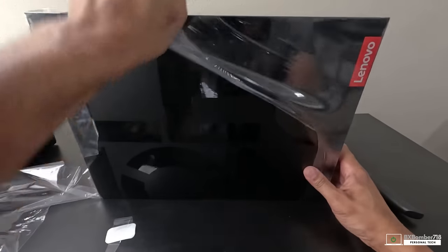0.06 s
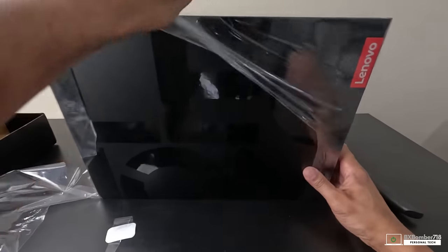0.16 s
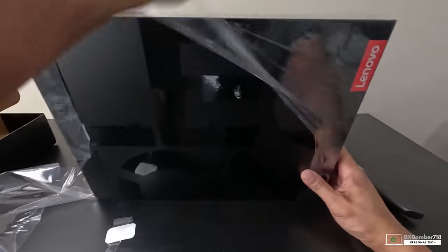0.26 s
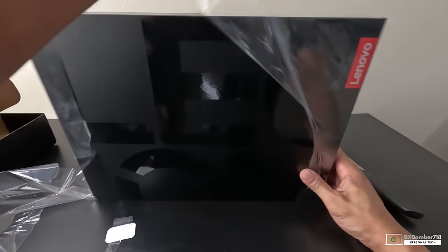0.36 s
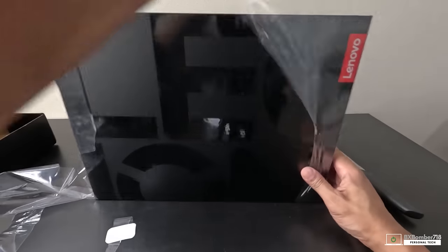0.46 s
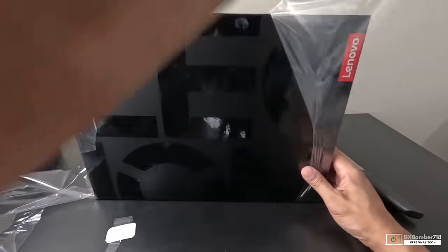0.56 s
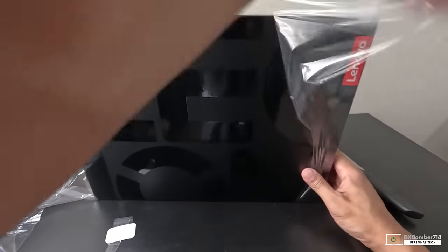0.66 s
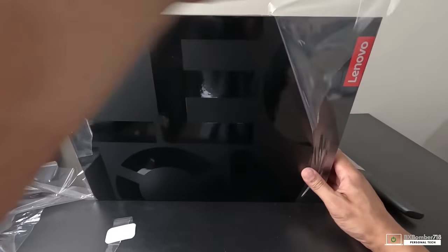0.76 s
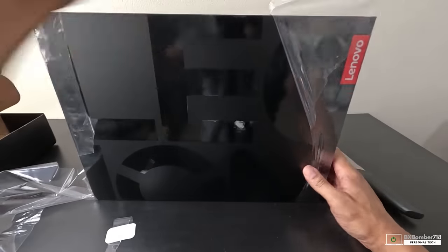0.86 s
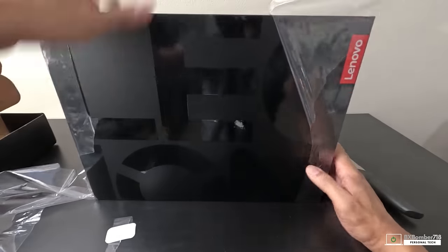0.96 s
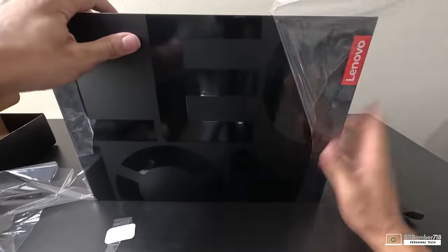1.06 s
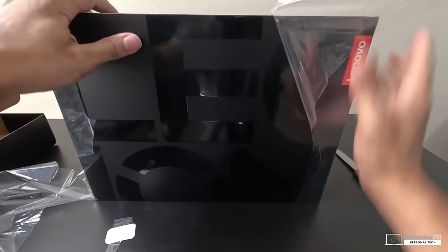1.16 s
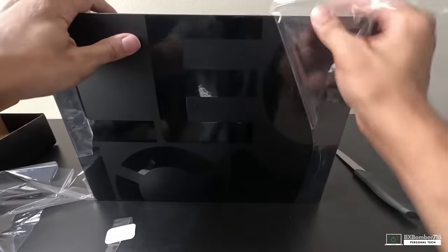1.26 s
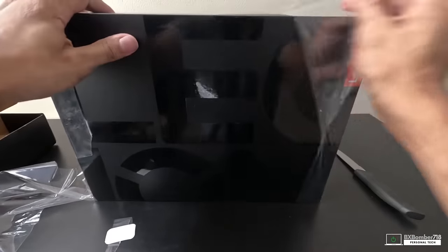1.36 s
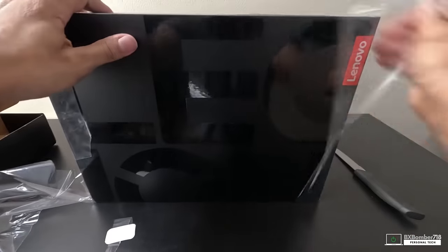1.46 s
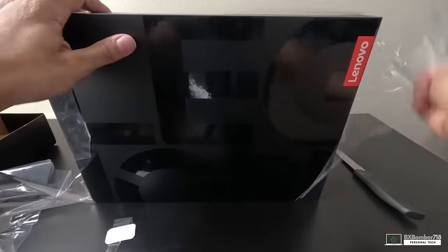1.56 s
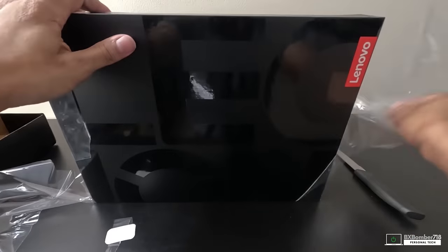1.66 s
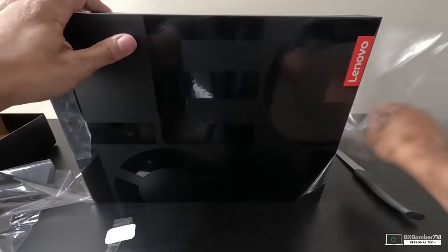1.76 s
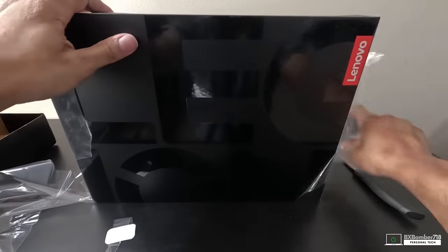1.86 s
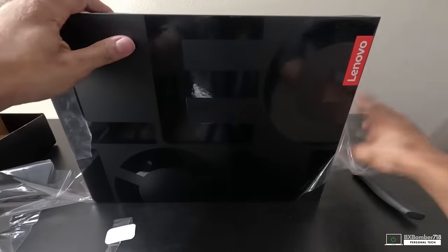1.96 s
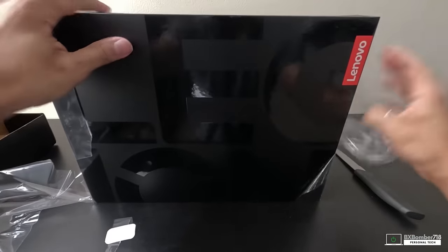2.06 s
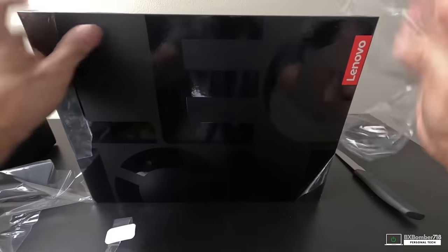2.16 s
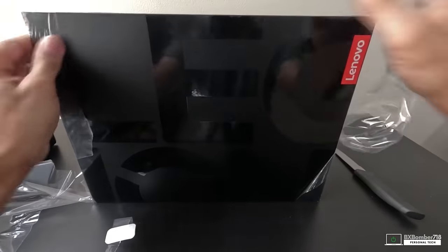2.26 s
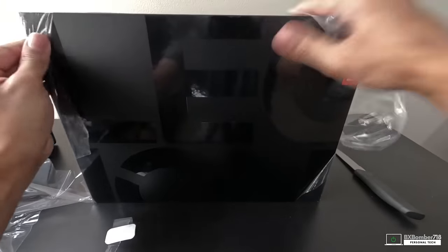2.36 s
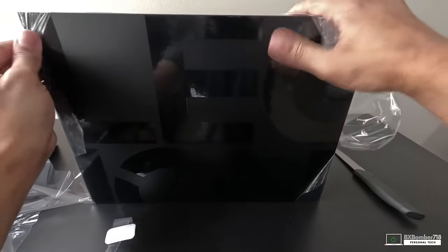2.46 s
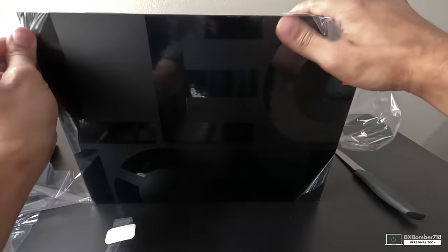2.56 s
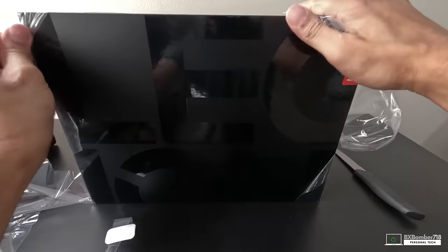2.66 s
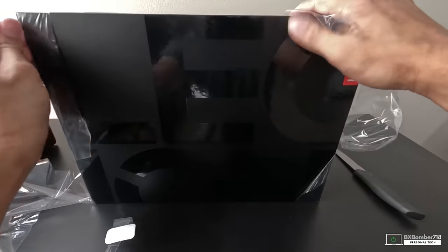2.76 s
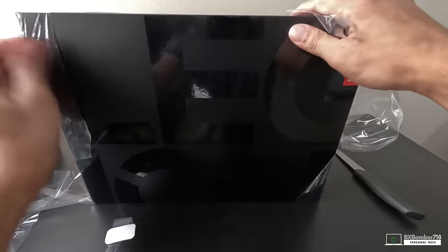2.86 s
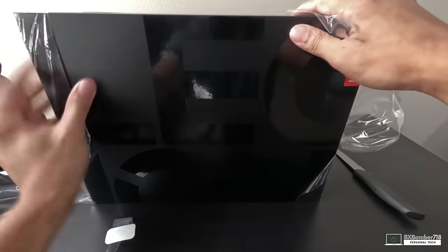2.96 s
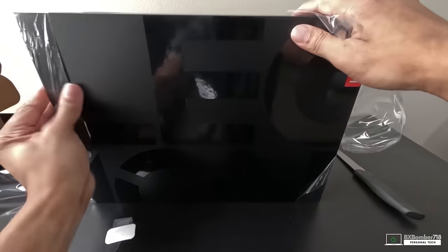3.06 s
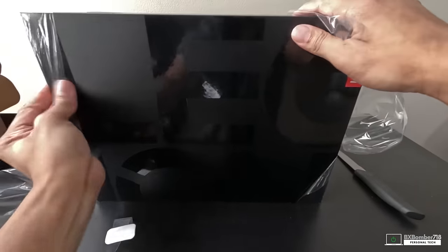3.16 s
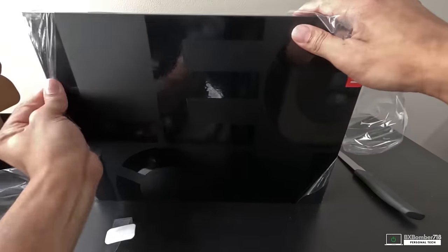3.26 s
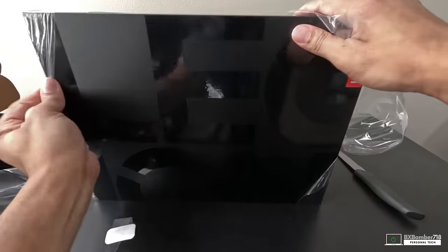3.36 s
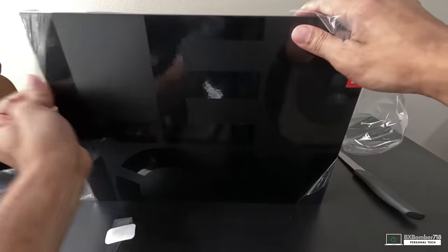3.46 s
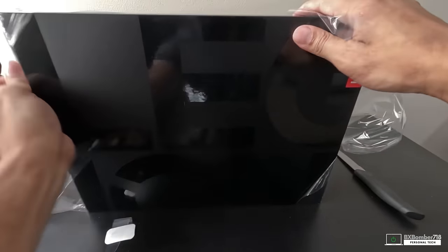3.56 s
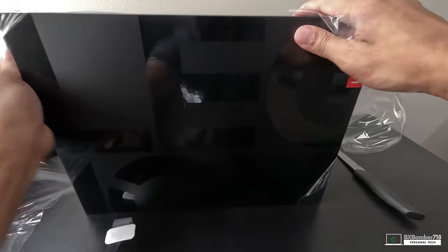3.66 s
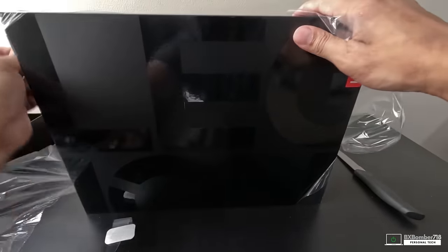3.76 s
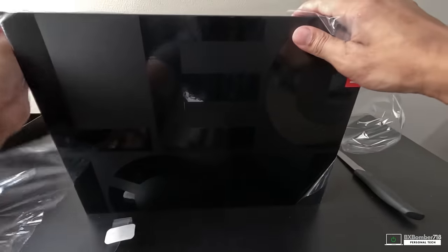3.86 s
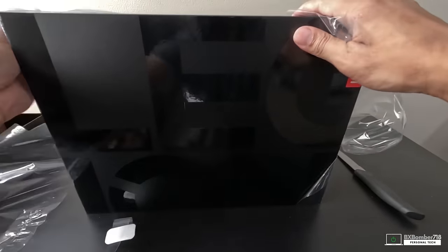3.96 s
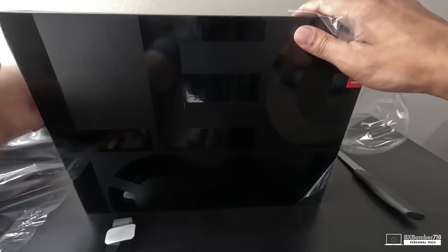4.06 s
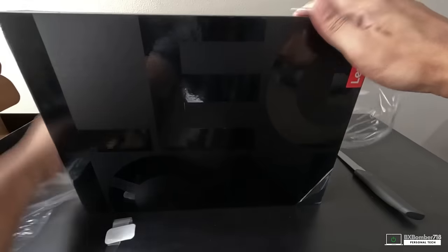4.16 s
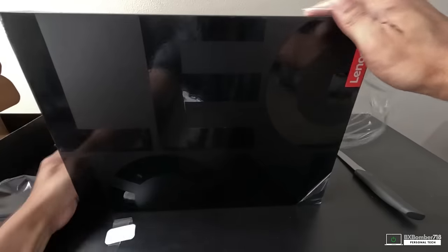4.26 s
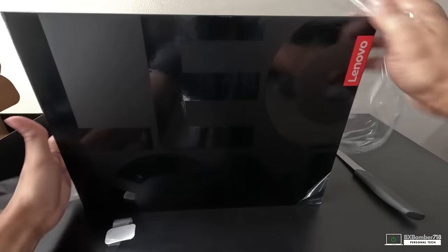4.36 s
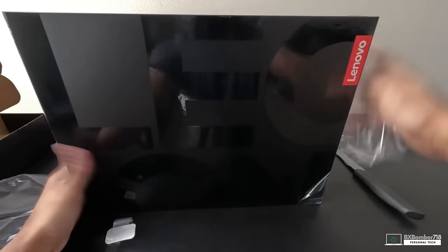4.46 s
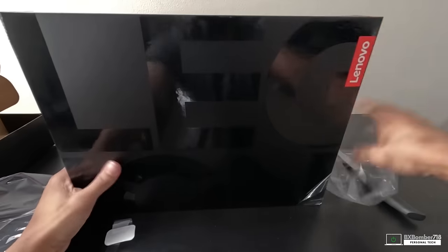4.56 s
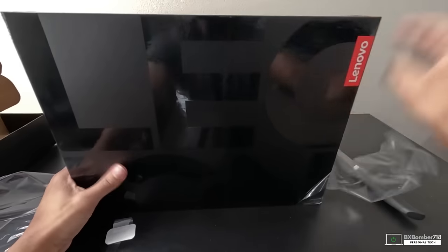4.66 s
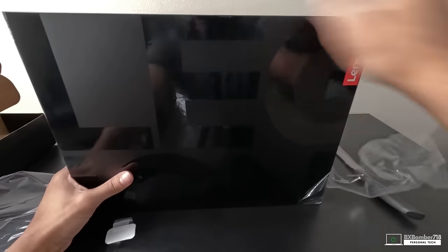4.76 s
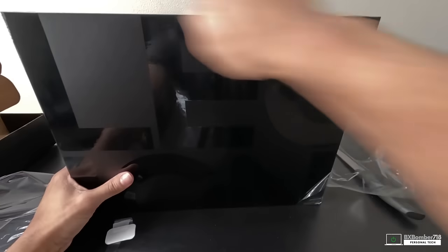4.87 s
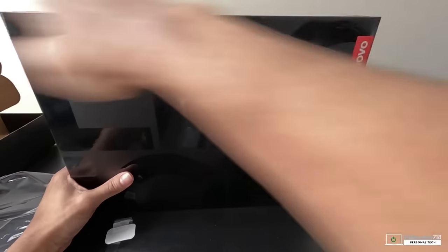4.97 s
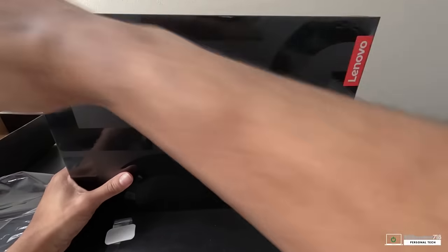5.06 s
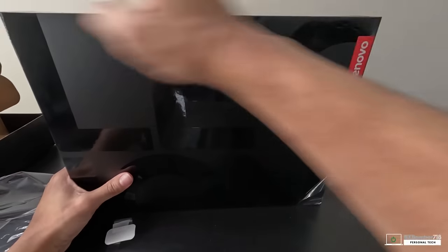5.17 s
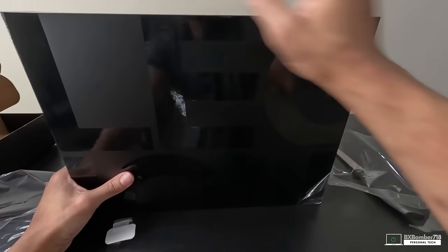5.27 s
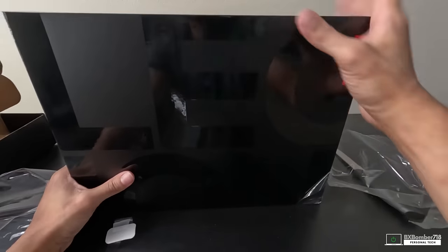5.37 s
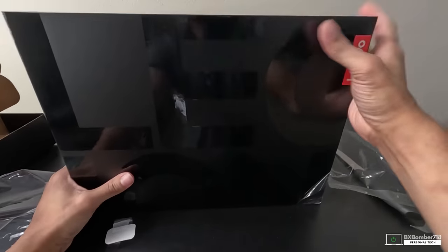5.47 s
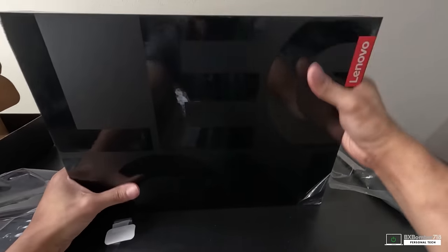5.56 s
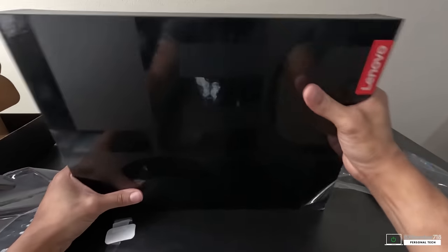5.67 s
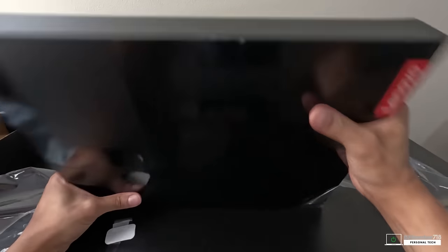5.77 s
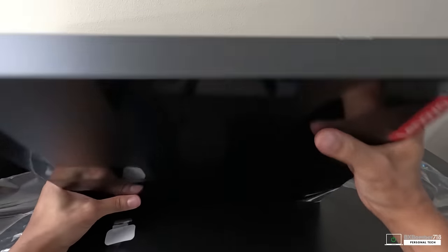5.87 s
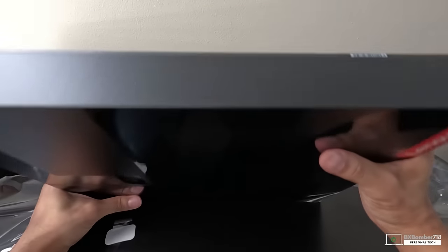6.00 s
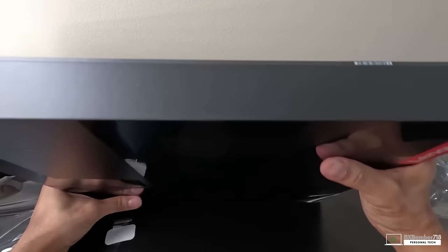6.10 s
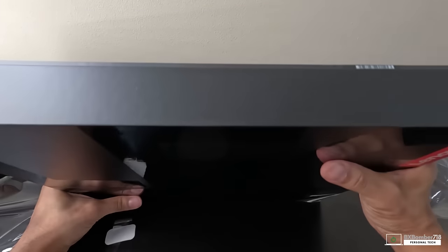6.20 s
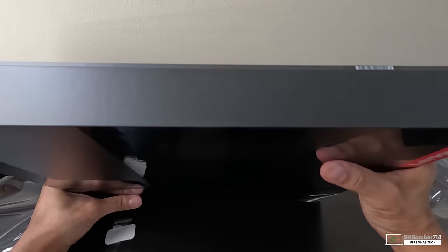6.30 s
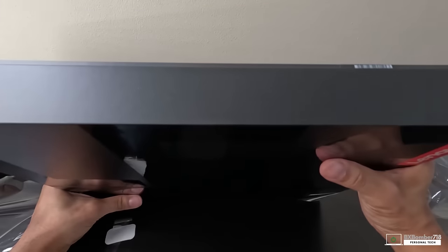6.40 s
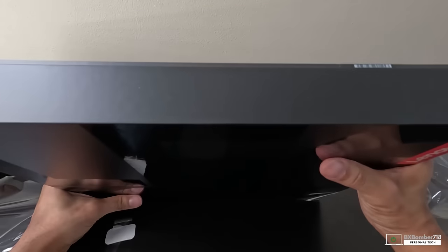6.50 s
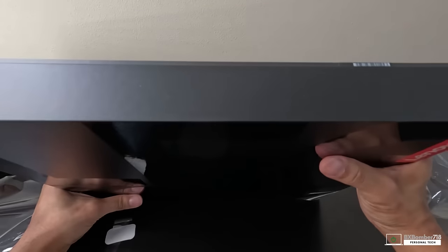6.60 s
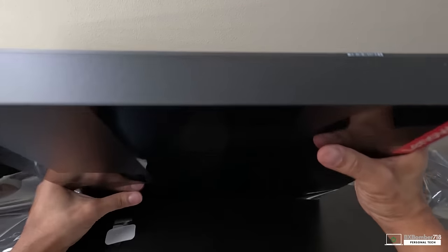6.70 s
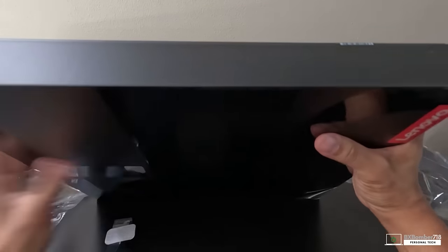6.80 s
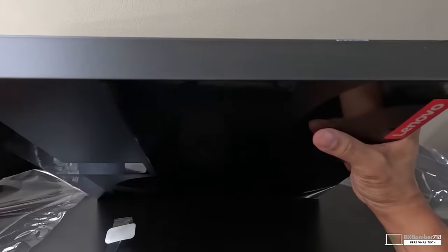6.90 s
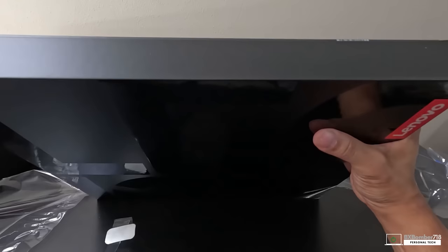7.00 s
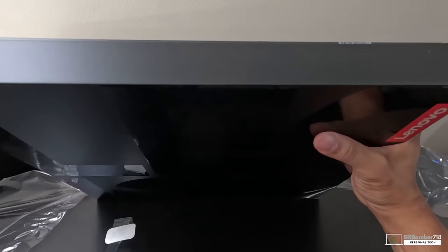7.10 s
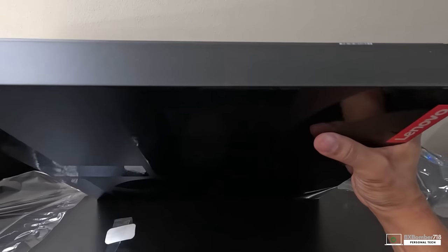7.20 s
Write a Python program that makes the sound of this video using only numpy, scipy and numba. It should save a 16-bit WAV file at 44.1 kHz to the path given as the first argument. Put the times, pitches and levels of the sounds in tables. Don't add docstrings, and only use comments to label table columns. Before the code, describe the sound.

Close, dry crackling of plastic film pulled off a glossy box in bursts, with one very loud pop midway, then dull rustles and soft knocks.

```python
import sys
import numpy as np
from scipy import signal
from scipy.fft import rfft, irfft, next_fast_len
from scipy.io import wavfile
from scipy.ndimage import uniform_filter1d
from numba import njit

SR = 44100
rng = np.random.default_rng(int(sys.argv[2]) if len(sys.argv) > 2 else 0)


def ratio_of_db(decibels):
    return 10 ** (np.asarray(decibels, float) / 20)


def int16_out(signal):
    q = np.round(np.clip(np.atleast_2d(signal).T, -1, 1) * 32767)
    wavfile.write(sys.argv[1], SR, q.astype(np.int16))


N = 319284

SPLIT_HZ = 4020
# f/Hz, level/dB
MIC_TREBLE = [(4000, 3.5), (6000, -2), (7800, -7), (9100, -16), (10400, -7), (11100, -2.5), (11900, 0.5),
              (12600, -4.5), (13200, -12), (14200, -46), (14950, -33.5), (15700, -62)]
# t/s, level/dB
TAUT_LEVEL = [
    (3.645, -63.5),
    (3.75, -62.5),
    (4.12, -46),
    (4.2, -55.5),
    (4.55, -48.5),
    (4.62, -59.5),
]


def unit(x):
    return x / np.sqrt(np.mean(x ** 2))


def colour(x, table):
    hz, db = np.transpose(table)
    f = np.linspace(1, SR / 2, 2049)
    cep = irfft(np.log(ratio_of_db(np.interp(np.log(f), np.log(hz), db))))
    cep[1:2048] *= 2
    cep[2049:] = 0
    return signal.fftconvolve(x, irfft(np.exp(rfft(cep))))[:N]


def band(x, kind, hz):
    return signal.sosfilt(signal.butter(4, hz, kind, fs=SR, output="sos"), x)


def fader(table):
    s, db = np.transpose(table)
    return ratio_of_db(np.interp(np.arange(N) / SR, s, db, -200, -200))


@njit
def bursts(start, size, hz, width, fall, noise):
    out = np.zeros(len(noise))
    for e in range(len(start)):
        g = np.tan(np.pi * hz[e] / SR)
        k = width[e] / hz[e]
        decay = np.exp(-1 / (fall[e] * SR))
        b, l, a = 0., 0., 1.
        ring = int(7 * fall[e] * SR + 3 * SR / width[e])
        for i in range(start[e], min(start[e] + ring, len(noise))):
            push = 2 * size[e] * a * (1 - a ** 3) * noise[i]
            v = (b + g * (push - l)) / (1 + g * (g + k))
            b, l, a = 2 * v - b, l + 2 * g * v, a * decay
            out[i] += k * v
    return out


def grains(count, spread_db, low_hz, high_hz, sharp, fall_s):
    when, pitch, loudness, length = rng.random((count, 4)).T
    start = (when * N).astype(np.int64)
    hz = low_hz * (high_hz / low_hz) ** pitch
    size = ratio_of_db(-spread_db * np.log(1 - .97 * loudness))
    fall = fall_s * (.3 + 2 * length)
    x = bursts(start, size, hz, hz / sharp, fall, rng.standard_normal(N))
    return x / np.sqrt(uniform_filter1d(x ** 2, size=3000) + 1e-12)


def swells(peak_s, fade_s, db, rest_db):
    d = np.arange(0, N, 32) / SR - peak_s[:, None]
    rise_share = 0.56
    below_db = 20 * np.where(d < 0, -d / rise_share, d) / np.asarray(fade_s)[..., None]
    below_db = np.where(d < 0, np.maximum(below_db, below_db ** 2 / 20), below_db)
    power = np.sum(ratio_of_db(2 * (db[:, None] - below_db)), axis=0) + ratio_of_db(2 * rest_db)
    return np.repeat(np.sqrt(power), 32)[:N]


def pulls():
    # t/s, time to fade 20 dB/ms, film level/dB, edge above film/dB, box above film/dB
    peel_pulls = [(0.0, 179, -40, -5.5, -1.5), (0.128, 258, -49.5, -5, -0.5), (0.264, 89.5, -37, -6, -1),
                  (0.342, 109, -40, -4, 7), (0.443, 191, -40.5, -8.5, 0.5), (0.537, 148, -35.5, -2, 1.5),
                  (0.621, 109.5, -41.5, 1, -9.5), (0.73, 101, -33.5, -1, -6.5), (0.962, 153, -49, -5, -8),
                  (1.1, 142, -54, -29, 16), (1.279, 29, -54, -1, 4), (1.351, 94, -31.5, -4, -1),
                  (1.402, 49, -35, -9, -2.5), (1.452, 171.5, -35.5, -3, -4), (1.563, 109, -22.5, -13.5, 0),
                  (1.619, 81.5, -26.5, -5.5, 0.5), (1.7, 70, -39.5, -0.5, 5.5),
                  (1.808, 137, -49.5, -0.5, -9), (1.898, 224, -46.5, -1.5, -6),
                  (2.105, 206, -44.5, -5.5, 0.5), (2.175, 140, -44.5, -4, -4), (2.27, 116, -50.5, -5, 0),
                  (2.335, 246, -52, -1, 4), (2.402, 91, -33, -7.5, -4.5), (2.531, 278, -54.5, 0.5, -18)]
    tear_pulls = [(2.758, 95, -47, -0.5, 4.5), (2.829, 622.5, -60, -13.5, 6),
                  (3.099, 414, -53, -15.5, -7.5), (3.239, 57, -47.5, -4.5, -2), (3.317, 198, -56, -12, 0.5),
                  (3.492, 162, -48.5, 0.5, -21), (3.558, 197, -36, -15.5, -0.5),
                  (3.645, 124.5, -43, -14.5, 9.5), (3.723, 633, -44.5, -8, -2), (3.89, 77.5, -37, -3, -2),
                  (4.006, 76, -44, -9.5, 2.5), (4.139, 399.5, -37.5, -4.5, -3), (4.297, 79, -35, -6, -1),
                  (4.345, 97, -39.5, 0.5, -24), (4.395, 142, -34.5, -4.5, -5.5),
                  (4.455, 66, -36.5, -5.5, -3), (4.508, 134, -34, -9, -7), (4.59, 138.5, -39, -7.5, -1)]
    tilt_pulls = [(4.934, 355, -52, -15.5, 3.5), (5.015, 65, -44.5, -13, -6), (5.05, 98, -60, -12, 24),
                  (5.314, 123, -46.5, -11, -16), (5.393, 162, -41.5, -20.5, 2.5), (5.69, 329, -38, -17, -7),
                  (5.815, 148, -33.5, -22, -10.5), (5.875, 97, -42, -18, 5), (6.01, 199, -48.5, -30, -3),
                  (6.126, 345.5, -55, -40, -7), (6.736, 173, -35.5, -14.5, -27),
                  (6.786, 257, -52.5, -11, 13), (7.136, 308, -52.5, -24, 0.5)]
    s, fade_ms, db, edge_db, box_db = np.transpose(np.vstack([peel_pulls, tear_pulls, tilt_pulls]))
    fade = fade_ms / 1000
    body = swells(s, fade, db - 3, -120)
    edge = swells(s, fade / 1.03, db + edge_db + 1.5, -120)
    drum = swells(s, fade / 0.99, db + box_db - 1, -74)
    return body, edge, drum


def rustle(body_gain, edge_gain):
    # f/Hz, level/dB
    film_shape = [(260, -34), (450, 4.5), (700, 9), (1400, 7.5), (1750, 8.5), (2400, 5.5), (3400, 5),
                  (4000, 1.5)]
    crackle = grains(count=16000, spread_db=2.2, low_hz=600, high_hz=15000, sharp=2.1, fall_s=.0006)
    hiss = ratio_of_db(-4) * rng.standard_normal(N)
    sheet = colour(colour(crackle + hiss, film_shape), MIC_TREBLE)
    clusters_db = 1.81 * unit(uniform_filter1d(rng.standard_normal(N), size=500))
    sheet = sheet * ratio_of_db(clusters_db)
    low = signal.sosfiltfilt(signal.butter(2, SPLIT_HZ, fs=SR, output="sos"), sheet)
    return unit(low) * body_gain + unit(sheet - low) * edge_gain


def snaps():
    # t/s, peak level/dB, crispness (edge above body)/dB, length/ms
    peel_snaps = [(0.053, -20.5, -20, 2.3), (0.138, -37, 3.5, 1.04), (0.245, -15.5, -11, 4.6),
                  (.336, -16, -0.5, 2.01), (0.4408, -36.5, 9.5, 0.64), (0.488, -33, 10, 1.05),
                  (0.533, -20, -5.5, 1.7), (.624, -20, 5, 1.34), (0.638, -28, 2.5, 1.7),
                  (0.695, -25.5, 9, 0.13), (.709, -38, 10, 3.1), (0.732, -31, 6, 0.91),
                  (0.745, -34, 12, 1.5), (0.759, -21, 3, 1.28), (0.794, -28.5, -8, 2), (.823, -37, 6, 0.77),
                  (0.943, -42, 8.5, 1.14), (0.979, -44, 10, 0.78), (1.036, -36, -3, 4.2),
                  (1.082, -34.5, -10.5, 4.9), (1.123, -39, -13, 2.5)]
    rip_snaps = [(1.272, -51, 11.5, 0.7), (1.29, -40, 11.5, 2.1), (1.295, -32.5, -1.5, 1.4),
                 (1.313, -25, -0.5, 3.3), (1.353, -29, -3.5, 3.1), (1.3653, -15, -3, 2),
                 (1.526, -29, 3.5, 2), (1.544, -17.5, -8, 2.7), (1.574, -13.5, -6.5, 1.2),
                 (1.577, -19, -2, 2.5), (1.578, -10.5, -3.5, 0.5), (1.612, -17, 1, 1.4),
                 (1.622, -18, -2, 1.77), (1.63, -16.5, -11.5, 3.7), (1.713, -25, -4, 1.76),
                 (1.8, -29, -2, 5.1), (1.862, -27, 1.5, 0.51), (1.909, -30.5, 1, 1.4),
                 (2.169, -34.5, 5.5, 1.9), (2.199, -29.5, -3.5, 4.4), (2.321, -35.5, 6, 2.1),
                 (2.385, -26, 0.5, 5.8), (2.408, -26.5, -6, 6.3), (2.553, -33.5, 6, 1.34),
                 (2.592, -35.5, -4.5, 2.34)]
    tear_snaps = [(2.737, -16, 2, 1.9), (2.759, -30.5, 3.5, 1.6), (2.771, -29.5, -7, 1.9),
                  (3.027, -41.5, -7.5, 2.3), (3.084, -37.5, -1, 1.16), (3.127, -53, 14.5, 0.71),
                  (3.239, -33, -1, 2.4), (3.327, -35.5, -14, 1.6), (3.339, -35, -19, 0.71),
                  (3.422, -41, 3.5, 2.3), (3.43, -35, -2, 0.46), (3.474, -31.5, -1.5, 0.57),
                  (3.49, -34, 9.5, 1.63), (3.496, -34.5, 2.5, 0.85), (3.515, -25, -8.5, 0.57),
                  (3.5545, -30.5, -3, 1.6), (3.5762, -30.5, 1.5, 1.7), (3.6363, -0.5, -18, 1.3),
                  (3.654, -21.5, -43, 1.1), (3.69, -30.5, -39.5, 2.1), (3.71, -35.5, -40, 2.1),
                  (3.779, -35, -36.5, 1.1), (3.8185, -27.5, -38, 1.6), (3.752, -28, -63, 1.86),
                  (3.801, -22.5, -79, .8), (3.875, -14.5, -35, 3.9), (3.893, -14, -34, 0.99),
                  (3.9966, -18, -8.5, 1.97), (4.122, -25, -23, 1.5), (4.159, -28, -5, 0.54),
                  (4.286, -23, -9, 0.63), (4.505, -22, -34, 8.4), (4.645, -38, 4, 1.9)]
    tilt_snaps = [(4.845, -38.5, -18, 1), (4.885, -42, -10, 0.94), (5.049, -31.5, -22, 1.6),
                  (5.135, -54, 4, 2.8), (5.277, -35.5, -17, 3.7), (5.316, -28.5, -27, 2.8),
                  (5.337, -25.5, -16.5, 4.4), (5.399, -25, -47, 2.2), (5.463, -30.5, -13, 3.5),
                  (5.665, -25, -20, 0.4), (5.675, -22, -20, 1.5), (5.703, -28, -13, 1.5),
                  (5.766, -27, -9, 1.25), (5.882, -25.5, -12, 1.14), (6.062, -35, -18, 3),
                  (6.561, -64, 18, 1.2), (6.607, -30.5, -50.5, 1.95), (6.642, -32.5, -16, 2.3),
                  (6.726, -24, -21, 2), (6.7952, -20.5, -10.5, 2.06), (6.897, -47, 2.5, 1.1),
                  (7.081, -43, -8, 2.2), (7.14, -43, -11, 2.5)]
    # t/s, peak level/dB, crispness/dB
    peel_ticks = [(0.1005, -27.5, -2.5), (0.1206, -24.5, -2), (0.4135, -32, -12), (0.4195, -22, -9),
                  (0.4255, -16.5, -14.5), (0.4315, -26, -14), (0.447, -26, -14), (0.461, -20.5, -23),
                  (0.4695, -26, -15), (0.478, -27, -9.5), (0.511, -27.5, 5), (0.519, -28.5, -8.5),
                  (0.557, -17.5, 6), (0.596, -31, 10), (0.657, -31.5, -1), (0.6628, -29.5, 8),
                  (0.6808, -26, 3), (0.7372, -15.5, 0.5), (0.8136, -30.5, -11.5), (0.856, -40, -7),
                  (0.8893, -30.5, -6.5), (0.941, -40, -3), (0.955, -33, -3), (1.0164, -39, -5),
                  (1.3245, -18.5, -1.5), (1.4012, -30, -7.5), (1.4058, -17.5, -5.5), (1.4456, -21, -1.5),
                  (1.4616, -27, -3.5), (1.5105, -35, -6.5), (1.6661, -25, -4.5), (1.689, -27.5, -6),
                  (1.786, -30.5, -19.5), (1.8117, -26, -5.5), (1.886, -20.5, -6.5), (1.9739, -41.5, 2),
                  (2.0033, -27, 2.5), (2.0126, -29, -7), (2.035, -34, -3), (2.134, -29.5, 6),
                  (2.1595, -28, 4), (2.2593, -40, -1), (2.352, -22.5, -4), (2.376, -27, 0.5),
                  (2.4523, -22.5, -4.5), (2.517, -26, -1), (2.5913, -35, -3), (2.6456, -27.5, -7.5)]
    tear_ticks = [(2.85, -27.5, -3), (2.9332, -29.5, -9), (3.068, -42, -2), (3.1074, -43, -5),
                  (3.1627, -46.5, 10), (3.222, -40, 0.5), (3.2464, -24, -5.5), (3.3158, -29, -2.5),
                  (3.3784, -44, -4), (3.401, -27, -14.5), (3.455, -31, -10.5), (3.9144, -20, -8),
                  (4.0362, -24, -1.5), (4.0604, -31.5, -8), (4.0946, -31, -7.5), (4.1889, -27.5, 0),
                  (4.2064, -18, -3.5), (4.2974, -20, -13.5), (4.32, -27, -2.5), (4.3385, -35.5, -4),
                  (4.357, -18.5, -2), (4.3824, -17.5, 0), (4.4074, -29.5, -9), (4.4214, -34, -8),
                  (4.439, -16.5, -2.5), (4.4577, -25, -2), (4.4674, -23.5, -5), (4.4882, -30.5, -12.5),
                  (4.619, -42, -11), (4.6584, -28.5, -6), (4.6877, -43, -5), (4.7154, -36.5, 3)]
    tilt_ticks = [(4.8269, -38, -5), (4.9312, -28, -22), (5.0085, -34, -16), (5.0174, -38, -17),
                  (5.2599, -35, -24), (5.561, -34, -14), (5.6176, -22, -24), (5.7997, -27, -13),
                  (5.8097, -28, -18), (5.8351, -27, -14), (5.8621, -25, -5), (5.8884, -29, -15.5),
                  (5.9224, -33, -18), (6.0444, -35, -16), (6.0774, -31, -21), (6.2866, -42, -13.5),
                  (6.7665, -19.5, -26), (7.2155, -32, -27)]
    tick_db, tick_ms = -9.5, .8
    ticks = [(s, db + tick_db, crisp, tick_ms)
             for s, db, crisp in np.vstack([peel_ticks, tear_ticks, tilt_ticks])]
    events = np.vstack([peel_snaps, rip_snaps, tear_snaps, tilt_snaps, ticks])
    s, db, crisp_db, ms = np.transpose(events)
    start = (s * SR).astype(np.int64)
    fall = np.clip(ms, .1, 8) / 1000

    noise = rng.standard_normal((2, N))
    step_at = start + (fall * SR / 4).astype(np.int64)
    noise[:, step_at] = np.outer([13.0, 5.0], np.clip(1.6 / ms, 0, 1))

    taut = (s > TAUT_LEVEL[0][0]) & (s < TAUT_LEVEL[-1][0]) & (crisp_db < -17)
    slack = taut & (crisp_db < -50)
    taut_hz = 1700 * np.where(slack, 0.71, 1)
    hz = np.where(taut, taut_hz, 2630 * 2 ** (crisp_db / 22))
    width = hz * np.where(taut, 0.14 * (1 + 2 * slack), 0.75)
    body = bursts(start, ratio_of_db(db + 2.0 + 4.24 * taut), hz, width, fall, noise[0])
    flat = np.zeros(len(s))
    edge = bursts(start, ratio_of_db(db + crisp_db + 1.5), flat + 9000, flat + 16000, fall, noise[1])
    return band(body, "low", 4070) + band(colour(edge, MIC_TREBLE), "high", SPLIT_HZ)


def box_rumble(gain):
    # f/Hz, level/dB
    box_shape = [(40, -36), (110, -27.5), (190, 2), (270, -2), (400, -2.5), (600, -11), (900, -12),
                 (1400, -37)]
    rub = grains(count=900, spread_db=-1.0, low_hz=123, high_hz=998, sharp=0.39, fall_s=0.0085)
    return unit(colour(rub + ratio_of_db(-2.0) * rng.standard_normal(N), box_shape)) * gain


def desk_thuds(gain):
    # f/Hz, level/dB
    desk_shape = [(22, -28), (48, -8.5), (100, 4), (150, 8), (250, -57.5)]
    # t/s, level/dB
    thuds = [(0.0, -61), (.26, -57), (.58, -36.5), (.735, -43), (1.05, -46.5), (1.35, -68), (1.576, -26.5),
             (2.41, -48), (4.52, -45), (5.69, -44.5), (6.135, -48.5), (6.78, -60.5)]
    s, db = np.transpose(thuds)
    shake = ratio_of_db(-11.5) * gain + swells(s, 0.079, db, -77)
    return unit(colour(rng.standard_normal(N), desk_shape)) * shake


def box_knocks():
    # t/s, peak level/dB, f/Hz
    knock_hits = [(0.246, -33, 293), (.335, -26, 273), (.353, -21.5, 400), (.373, -23.5, 298),
                  (.794, -41, 207.4), (1.039, -44.5, 205), (1.099, -32, 309), (1.147, -39.5, 290),
                  (1.316, -32.5, 340), (1.356, -31, 240), (1.551, -18, 266.3), (1.572, -16, 192),
                  (1.589, -25, 224), (1.612, -20, 292), (1.632, -17, 194), (1.701, -29.5, 290.6),
                  (2.106, -36.5, 250), (2.161, -39, 299), (2.407, -30, 238),
                  (2.738, -32.5, 228.7), (2.765, -41, 274), (3.514, -24, 352), (3.6374, -3.5, 281),
                   (3.614, -25.5, 378), (3.665, -33, 277), (3.687, -31, 290), (3.883, -20.5, 400),
                   (3.899, -32, 338), (3.997, -22, 240), (4.122, -29.5, 260), (4.584, -23.5, 403),
                   (4.845, -38, 303), (5.013, -34, 194), (5.053, -25.5, 302), (5.356, -40, 187.6),
                   (5.402, -35.5, 283), (5.422, -43, 225.5), (5.647, -35, 207), (5.948, -30, 313.4),
                   (6.128, -45.5, 156), (6.766, -38.5, 257), (6.82, -33, 326), (6.899, -32.5, 294),
                   (6.981, -42.5, 303), (7.082, -44, 270), (7.141, -43.5, 248),
                  (1.398, -23, 804), (1.456, -25, 797), (1.945, -46, 249.4), (2.059, -47, 263),
            (2.28, -46.5, 249.5), (4.151, -32.5, 281), (4.246, -30, 236.5), (4.502, -31, 399),
            (4.931, -41, 206), (5.085, -53, 252.5), (5.28, -45, 388), (5.559, -41, 330), (5.689, -42, 240),
            (5.804, -36, 382), (5.835, -26.5, 428), (5.851, -30.5, 197.5), (5.875, -34.5, 222),
            (5.926, -41, 400), (5.989, -49, 217), (6.26, -61, 201), (6.286, -59, 198), (6.693, -51.5, 230),
            (6.912, -36.5, 227), (7.154, -44, 183.6), (7.197, -48.5, 264)]
    # f/Hz, level re knock/dB, t60/s
    panels = [(272.7, -19, 0.29), (310.8, -24, 0.37), (200, -23.5, 0.32)]
    sag, sag_s = 0.17, 0.0071
    knocks = np.zeros(N)
    t = np.arange(SR // 2) / SR
    bent_t = t + sag * sag_s * (1 - np.exp(-t / sag_s))
    walls = sum(ratio_of_db(rel_db) * np.sin(2 * np.pi * f * t) * 1000 ** (-t / t60) for f, rel_db, t60 in panels)
    walls = walls * (1 - np.exp(-t / 0.013))
    for s, db, hz in np.array(knock_hits):
        t60 = 8.53 / hz * 2 ** (-(db + 40.0) / 34)
        overtone = np.sin(2 * np.pi * 2.375 * hz * t) * np.exp(-t / 0.011)
        ring = np.sin(2 * np.pi * hz * bent_t) - db / 45 * overtone
        ring = ratio_of_db(db + 8.5) * ring * 1000 ** (-t / max(t60, .01)) * (1 - np.exp(-t / 0.0013))
        ring += ratio_of_db(db + 2.5) * walls
        i = int(s * SR)
        knocks[i:i + len(t)] += ring[:N - i]
    return band(knocks, "high", 132)


def taut_flap():
    ring = grains(count=500, spread_db=4, low_hz=1450, high_hz=2050, sharp=6, fall_s=.0015)
    return ring * fader(TAUT_LEVEL)


def squeak():
    # t/s, level/dB
    squeak_level = [(4.885, -85), (4.9, -56), (4.94, -57), (4.95, -95), (6.105, -96), (6.125, -63),
                    (6.146, -53), (6.175, -78), (6.192, -57), (6.22, -69), (6.3, -73)]
    wobble = 1 + 0.22 * uniform_filter1d(rng.standard_normal(N), size=600)
    phase = 2 * np.pi * np.cumsum(1005 * wobble) / SR
    tone = ratio_of_db(-3) * np.sin(phase) + np.sin(2 * phase) + ratio_of_db(-3.5) * np.sin(3 * phase)
    return tone * fader(squeak_level)


def scrape():
    # t/s, level/dB
    scrape_level = [
        (5.9, -60.5),
        (6.0, -55.5),
        (6.07, -56),
        (6.2, -66),
        (6.32, -64.5),
        (6.4, -90),
    ]
    wall_hz = [650, 1250]
    ring = sum(grains(count=1500, spread_db=3, low_hz=.9 * hz, high_hz=1.1 * hz, sharp=8, fall_s=.003)
               for hz in wall_hz)
    return ring * fader(scrape_level)


def room(near):
    t60_s, level_db = .16, -23
    t = np.arange(SR // 2) / SR
    tail = rng.standard_normal(len(t)) * 1000 ** (-t / t60_s) * (t > .002)
    return ratio_of_db(level_db) * signal.fftconvolve(near, tail / np.sqrt(np.sum(tail ** 2)))[:N]


def air():
    # f/Hz, level per Hz/dB
    air_shape = [(22, -24), (44, 2), (206, -5.5), (269, -5), (1060, -13.5), (8990, -41.5), (12000, -46),
                 (13700, -47.5)]
    return unit(colour(rng.standard_normal(N), air_shape)) * ratio_of_db(-62.5)


def scene():
    body, edge, drum = pulls()
    film = rustle(body, edge) + snaps() + taut_flap()
    box = box_rumble(drum) + desk_thuds(drum) + box_knocks() + squeak() + scrape()
    near = film + box
    mono = near + room(near) + air()
    return np.array([mono, mono])


def top_cut(x):
    return signal.sosfilt(signal.butter(12, 15800, fs=SR, output="sos"), x)


def record(dry):
    # f/Hz, side over mid/dB
    port_side = [(3000, -36.5), (6000, -16.5), (9000, -19), (10500, -12.5), (11700, -7), (12500, 4.5),
                 (13200, -1.5), (15500, -6.5)]
    mid = 1.15 * np.tanh(dry.mean(axis=0) / 1.15)
    mid = signal.lfilter(*signal.iirnotch(9080, 22, SR), mid)
    stray = mid * unit(uniform_filter1d(rng.standard_normal(N), size=400, mode="wrap"))
    lag = np.imag(signal.hilbert(mid, next_fast_len(N)))[:N]
    hz, db = np.transpose(port_side)
    gain = ratio_of_db(np.interp(np.log(np.fft.rfftfreq(N, 1 / SR) + 1), np.log(hz), db))
    side = irfft(rfft(-.6 * lag - 0.055 * mid + 0.61 * stray) * gain, N)
    return top_cut(np.array([mid + side, mid - side]))


dry = scene()
out = record(dry)
int16_out(out)
```